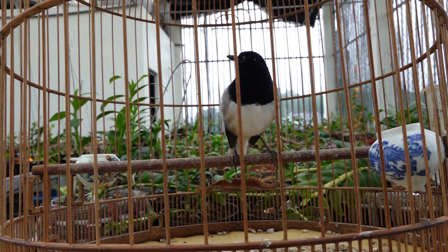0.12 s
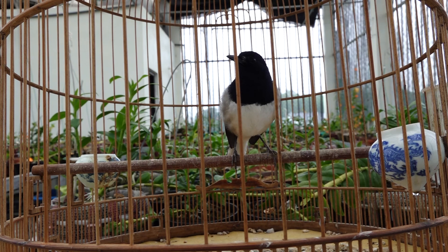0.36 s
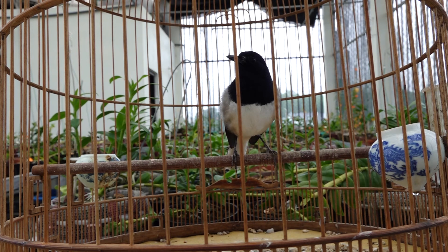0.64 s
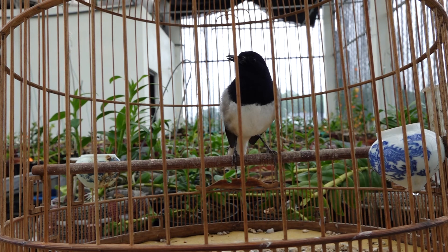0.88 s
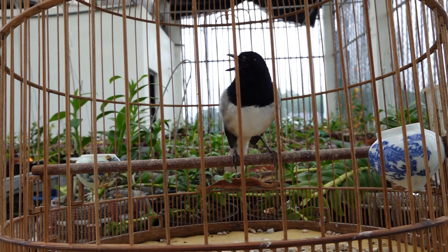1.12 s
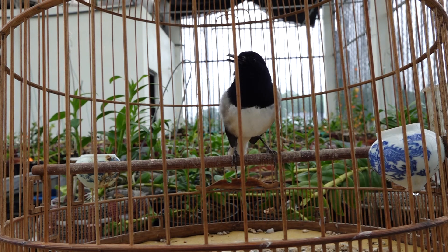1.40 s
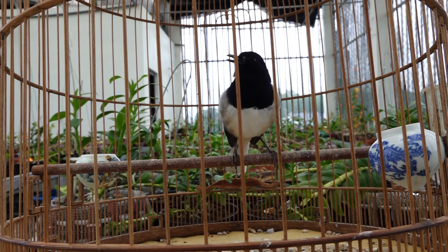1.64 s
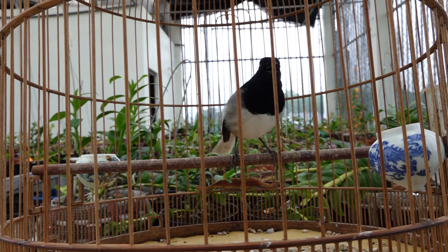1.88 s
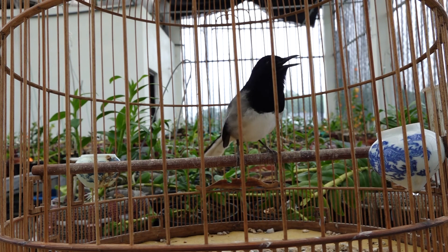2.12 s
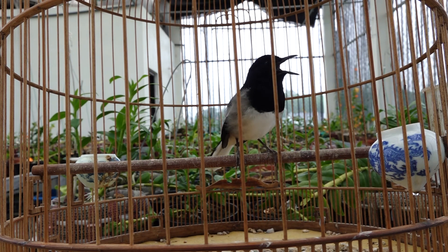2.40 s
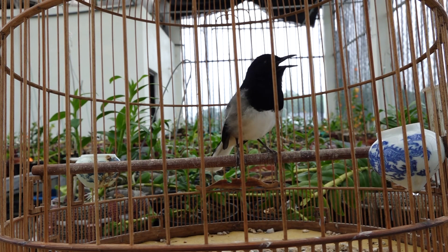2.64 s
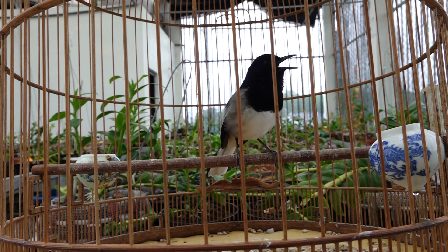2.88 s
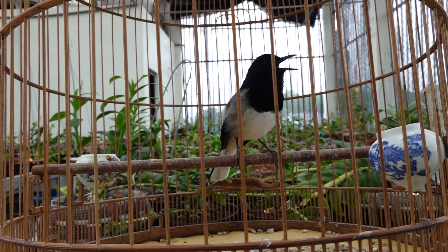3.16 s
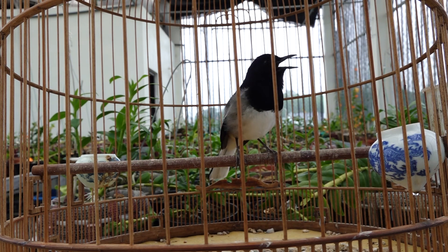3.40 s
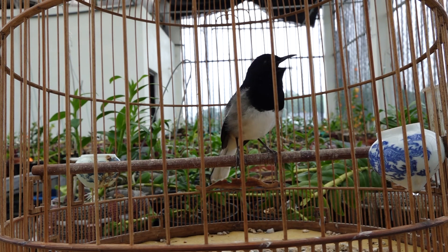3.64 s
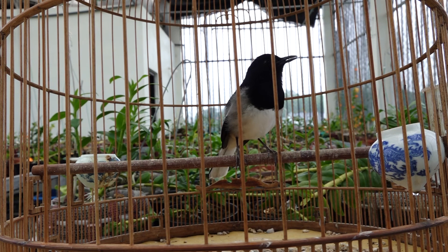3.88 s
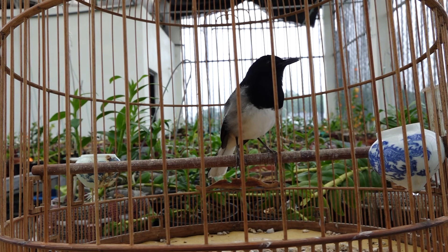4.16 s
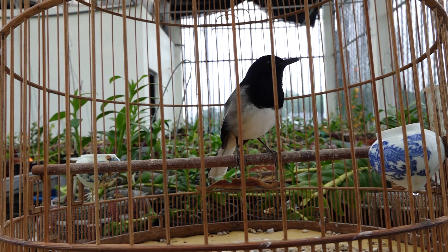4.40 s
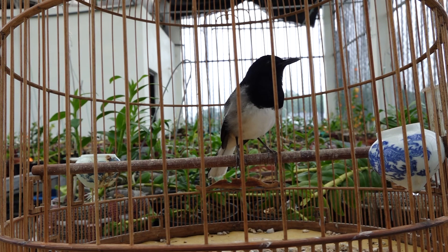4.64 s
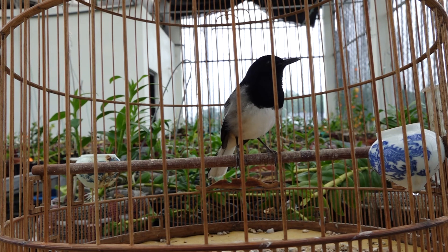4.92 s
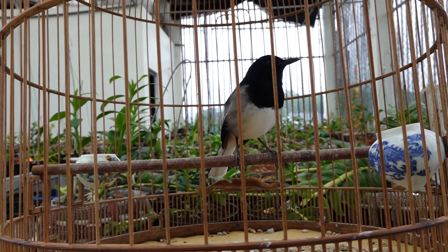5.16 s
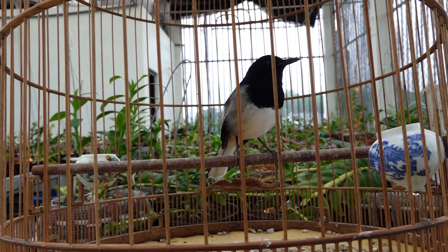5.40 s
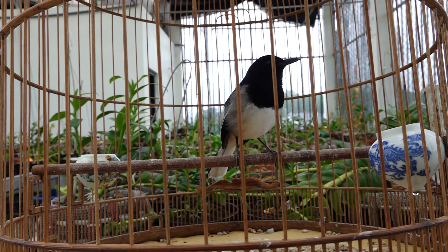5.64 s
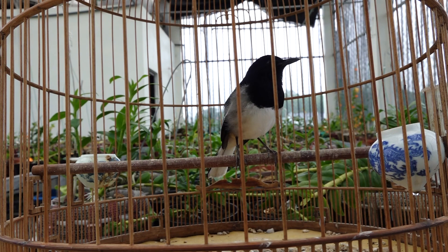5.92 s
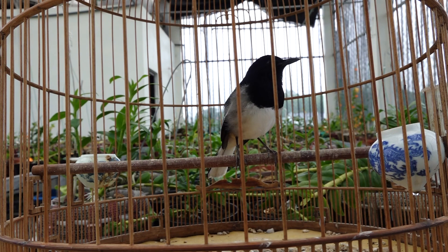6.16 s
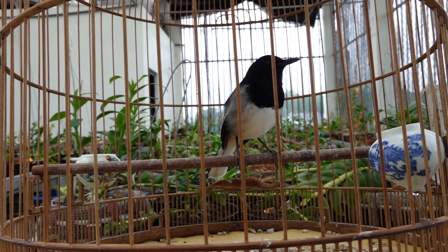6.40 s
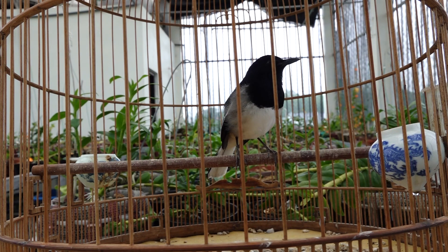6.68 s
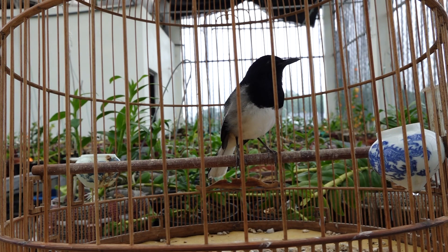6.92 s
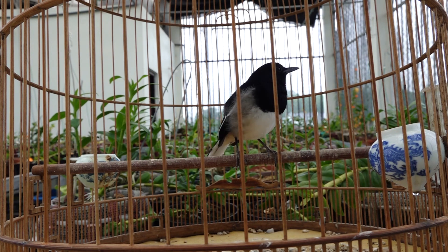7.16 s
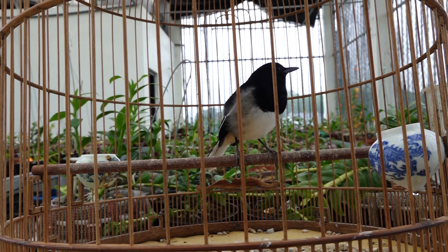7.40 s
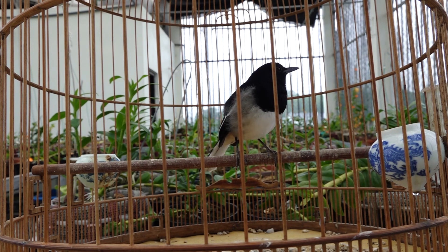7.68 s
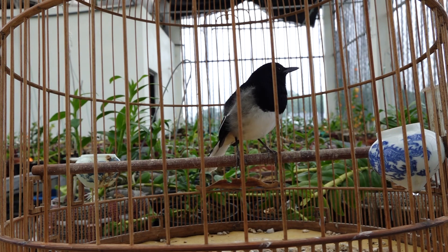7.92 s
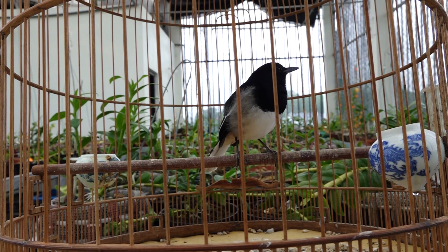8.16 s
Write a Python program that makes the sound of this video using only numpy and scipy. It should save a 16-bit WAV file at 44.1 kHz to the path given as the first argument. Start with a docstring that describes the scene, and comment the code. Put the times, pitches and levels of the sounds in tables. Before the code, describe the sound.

A terrace with hard walls, in stereo, quiet at first: low town murmur, soft hiss and very faint far birds. At about 1.06 s a caged bird close by begins with a high whistle plunging, then levelling and dropping. Short, fluttering chirps follow at 1.45, 1.66 and 1.87 s, lower and softer, then a brighter one at 2.0. From 2.25 to 2.65 s comes a loud, sustained, clear whistle, stepping slightly upward, with a lower tail. Long downward swoops follow at 2.8 and 3.07 s, then rapid, broken chirps from 3.4 to 3.8 s. Short echoes and a light reverberant tail trail the notes. The song then stops; background hiss creeps back up. Distant drones glide faintly around 3 to 5 s; far chirps are sparse, then busier after 6 s. A weak low buzz and tiny ticks come near 6.6 to 7 s, with murmur until 8.4 s.

```python
"""A terrace between hard walls: a caged songbird sings one loud phrase of sliding whistles.
Its notes are near-sines with weak harmonics; where both sides of its syrinx sound, mixing tones appear.
Far birds (wobbling sines), drones (gliding noise bands), a short buzz (harmonics) and sparse ticks surround it.
Town murmur and hiss are banded noise; the walls answer with echoes and dying noise.
The recorder turns its gain down under the song and lets it creep back."""
import sys
import numpy as np
from scipy import signal
from scipy.fft import rfft, irfft, next_fast_len
from scipy.io import wavfile
from scipy.ndimage import uniform_filter1d, minimum_filter1d

SR = 44100
rng = np.random.default_rng(int(sys.argv[2]) if len(sys.argv) > 2 else 0)


def makeup_ratio(level_db):
    """Linear amplitude ratio for a level in decibels (20 dB per factor of ten)."""
    decades = np.asarray(level_db, float) / 20
    return 10 ** decades


def transcribe(signal):
    """Save signal, clipped to [-1, 1], as a 16-bit WAV file at the path in sys.argv[1]."""
    frames = np.atleast_2d(signal).T
    limited = np.clip(frames, -1, 1)
    pcm = np.round(limited * 32767).astype(np.int16)
    wavfile.write(sys.argv[1], SR, pcm)


N = 366030


def rms_one(x):
    """Scale to rms 1."""
    return x / np.sqrt(np.mean(x ** 2) + 1e-20)


def at_hz(points, hz):
    """Read a spectrum table on a log frequency axis."""
    table_hz, values = np.transpose(points)
    return np.interp(np.log(hz), np.log(table_hz), values)


def drift(rate_hz):
    """Random wandering of rms 1: white noise through two equal one-pole low-passes."""
    r = np.exp(-2 * np.pi * rate_hz / SR)
    noise = rng.standard_normal(N + SR)
    return rms_one(signal.lfilter([1], [1, -2 * r, r * r], noise)[SR:])


def band_filter(x, order, hz, kind):
    """Butterworth filter."""
    return signal.sosfilt(signal.butter(order, hz, kind, fs=SR, output="sos"), x)


def played(rows, edge_s):
    """Sample span, gate that opens and shuts within edge_s, and columns joined by lines."""
    s, *columns = np.transpose(rows)
    span = np.arange(max(int(s[0] * SR), 0), min(int((s[-1] + edge_s) * SR), N))
    t = span / SR
    gate = np.clip(np.minimum(t - s[0], s[-1] + edge_s - t) / edge_s, 0, 1)
    return span, gate, [np.interp(t, s, c) for c in columns]


def convolve(x, response):
    """FFT convolution, cut to the scene."""
    size = next_fast_len(N + response.shape[-1])
    return irfft(rfft(x, size) * rfft(response, size), size)[..., :N]


# Contours of the song, one list a note, before flutter, colour and recorder: time_s, pitch_hz, level_db
SONG = [
    [(1.062, 6350, -26), (1.07, 6440, -18), (1.079, 5890, -10), (1.1, 4855, -11), (1.118, 4490, -8),
     (1.162, 4977, -10.5), (1.19, 5067, -8), (1.244, 4996, -15), (1.292, 4450, -7), (1.307, 4010, -13.5),
     (1.318, 3784, -24.5)],
    [(1.452, 2466, -34), (1.463, 1903, -28), (1.474, 2590, -17), (1.48, 2913, -15.5), (1.508, 3190, -10),
     (1.516, 3516, -10.5), (1.528, 3780, -17.5), (1.535, 3824, -27.5)],
    [(1.66, 2350, -30), (1.665, 2055, -25.5), (1.67, 1734, -30.5), (1.682, 2160, -24), (1.693, 2495, -14.5),
     (1.709, 2198, -19.5), (1.72, 1845, -21.5), (1.732, 1723, -25.5), (1.744, 2383, -21),
     (1.752, 2250, -20.5), (1.758, 1854, -25), (1.768, 2500, -25.5)],
    [(1.865, 2337, -28.5), (1.884, 2470, -16.5), (1.893, 2597, -10.5), (1.902, 2942, -12),
     (1.934, 3290, -9.5), (1.945, 3460, -21.5)],
    [(1.872, 1780, -37.5), (1.876, 1846, -27.5), (1.886, 2315, -15.5)],
    [(2.017, 2500, -29.5), (2.026, 3313, -10), (2.062, 3374, -4.5), (2.073, 3100, -10.5),
     (2.081, 2554, -14), (2.086, 2057, -23.5), (2.094, 2490, -15), (2.101, 2716, -7.5), (2.116, 2828, -13),
     (2.146, 2847, -8), (2.155, 2900, -21.5)],
    [(2.247, 4050, -20), (2.255, 4230, -10), (2.264, 4332, -4.5), (2.295, 4227, -4), (2.368, 4283, -0.35),
     (2.418, 4408, -3.3), (2.445, 4536, -3.5), (2.45, 4688, -4), (2.49, 4625, -3.5), (2.531, 4646, -2.5),
     (2.554, 4577, -6.5), (2.579, 4587, -11), (2.59, 4670, -19.5)],
    [(2.555, 3427, -40.5), (2.566, 3605, -18.5), (2.584, 3700, -9.5), (2.6, 3790, -12), (2.635, 3729, -8),
     (2.646, 3796, -16.5), (2.655, 3560, -22.5)],
    [(2.778, 6790, -29), (2.79, 6100, -21), (2.8, 6050, -15.5), (2.825, 5180, -7.5), (2.849, 4295, -5),
     (2.874, 3830, -6), (2.896, 3612, -5.5), (2.976, 3456, -7.5), (3.002, 3320, -15.5)],
    [(2.805, 3224, -30), (2.838, 2673, -31)],
    [(3.07, 3400, -38.5), (3.076, 3665, -24), (3.085, 4285, -9.5), (3.096, 4400, -5.5), (3.148, 4253, -3),
     (3.17, 3714, -1), (3.207, 3510, -2), (3.241, 3420, -10), (3.258, 3550, -19.5)],
    [(3.375, 1883, -43), (3.382, 2880, -28), (3.388, 3665, -15.5), (3.394, 4476, -8), (3.401, 4316, -9),
     (3.409, 4620, -5), (3.422, 5050, -16)],
    [(3.42, 4126, -8.5), (3.425, 4113, -6), (3.433, 3290, -16.5), (3.436, 3330, -13.5), (3.444, 3877, -10),
     (3.451, 3220, -18.5), (3.456, 2814, -28)],
    [(3.598, 3760, -31), (3.603, 4536, -8.5), (3.612, 4485, -7), (3.624, 4550, -8.5), (3.631, 4690, -34),
     (3.64, 4670, -18)],
    [(3.62, 2570, -43.5), (3.629, 3374, -13.5), (3.64, 3290, -18.5), (3.648, 2936, -28),
     (3.658, 3080, -21.5), (3.665, 3230, -31)],
    [(3.695, 5100, -31), (3.703, 5345, -16.5), (3.708, 5046, -15.5), (3.713, 4760, -9.5),
     (3.72, 4586, -7.5), (3.772, 3742, -13.5), (3.788, 3710, -15), (3.797, 3490, -28)],
    [(3.722, 4030, -17), (3.742, 3523, -12), (3.769, 2975, -21.5), (3.776, 2900, -26.5), (3.79, 2888, -21)],
]
# Base harmonic levels of each note, re its fundamental: second_db, third_db, fourth_db
OVERTONES = [(-30, -50.5, -67), (-23.5, -39, -44), (-24, -34, -35.5), (-24, -40, -35), (-21, -33, -44.5),
             (-30, -38.5, -43.5), (-33.5, -42, -70), (-19, -60, -48.5), (-28.5, -53, -42.5),
             (-23.5, -44.5, -56.5), (-29, -50, -46), (-26.5, -53, -59.5), (-23.5, -58.5, -53.5),
             (-30.5, -58, -72), (-18, -28.5, -53.5), (-29, -47.5, -62.5), (-31, -58, -54.5)]
# Throat colour added to the second harmonic: pitch_hz, gain_db
SECOND_BY_PITCH = [(1800, 6.5), (2500, 0), (3300, 2), (3600, -6), (4400, -1.5), (5000, 6), (5900, -3),
                   (6500, -8.5)]
# Mixing tones of the two sides: times_first_pitch, times_second_pitch
MIXING = [(1, 1), (1, -1), (-1, 2), (2, -1), (2, 1), (1, 2)]
# Level of each mixing tone re the geometric mean of both sides: level_db
MIXING_DB = [-18, -34, -30.5, -31.5, -37.5, -38]
# Colour of the song's high treble: frequency_hz, gain_db
TREBLE = [(9800, 0.5), (11300, -13.5), (13200, 8.5), (16000, 3)]


def songbird():
    """Near-sine whistles; a note begun while another still sounds comes from the second side."""
    thinning = 0.69  # dB the second harmonic gains on the first per dB the note sinks
    bend, dip, rasp = flutter()
    bend = bend * (1 + 0.0032 * drift(88))
    air_noise = rms_one(band_filter(rng.standard_normal(N), 2, [2500, 7000], "band"))
    phase, size = np.zeros((2, N)), np.zeros((2, N))
    out, busy_until = np.zeros(N), 0
    for rows, (second_db, third_db, fourth_db) in zip(SONG, OVERTONES):
        span, gate, (hz, level_db) = played(rows, 0.0018)
        second_db = second_db + at_hz(SECOND_BY_PITCH, hz) + thinning * (level_db.max() - level_db)
        second_db = np.minimum(second_db, -8.0)
        side = int(span[0] < busy_until)
        busy_until = 0 if side else span[-1]
        hz = uniform_filter1d(hz, size=130) * bend[span]
        turn = 2 * np.pi * np.cumsum(hz) / SR
        height = np.sqrt(2) * gate * makeup_ratio(level_db) * dip[span]
        phase[side, span], size[side, span] = turn, height
        wave = np.sin(turn) + rasp[span] * air_noise[span]
        harmonics_db = [second_db, third_db, fourth_db, fourth_db - 0.5, fourth_db - 8.0]
        for k, db in enumerate(harmonics_db, 2):
            wave += makeup_ratio(db) * np.sin(k * turn) * (k * hz < SR / 2)
        out[span] += height * wave
    both = np.sqrt(size[0] * size[1])
    for (first, second), db in zip(MIXING, MIXING_DB):
        out += makeup_ratio(db) * both * np.sin(first * phase[0] + second * phase[1])
    bins_hz = np.arange(1, N // 2 + 2) * SR / N
    out = irfft(rfft(out) * makeup_ratio(at_hz(TREBLE, bins_hz)), N)
    # a small open beak radiates no lows
    return band_filter(out + 1e-18, 2, 1300, "high")


# Stretches where the voice flutters: start_s, end_s, mean_rate_hz, pitch_flick_share, level_swing_share
FLUTTER = [(1.17, 1.265, 85, .07, .35), (1.452, 1.47, 300, .08, .4), (1.48, 1.508, 120, .2, .3),
           (1.508, 1.536, 400, .3, .8), (1.655, 1.68, 300, .06, .4), (1.893, 1.947, 125, .22, .5),
           (2.545, 2.6, 150, .01, .2), (2.805, 2.845, 200, .005, .1), (3.2, 3.26, 70, .05, .55),
           (3.375, 3.456, 300, .07, .3), (3.72, 3.79, 250, .01, .15)]


def flutter():
    """Large flicks snap, small ones ripple: each drives pitch and level up, then drops; air rasps meanwhile."""
    tremor_db, tremor_hz = 1, 39.8  # small random level tremor
    rasp_db, rasp_db_per_octave = -40, 11  # air noise at 150 flicks a second, more for faster flutter
    bend, dip, rasp = np.ones(N), makeup_ratio(tremor_db * drift(tremor_hz)), np.zeros(N)
    uneven = 1 + .6 * np.tanh(drift(60))
    for start, end, per_s, flick, swing in FLUTTER:
        span, gate, _ = played([(start, 0), (end, 0)], 0.0043)
        sawtooth = np.cumsum(per_s * uneven[span] / SR) % 1
        # larger flicks are rounded less
        ramp = uniform_filter1d(sawtooth, size=max(48, int(SR / per_s * (.45 - 2 * flick))))
        bend[span] += gate * flick * (ramp ** 5 - 1 / 6)
        dip[span] *= 1 + gate * swing * (2 * ramp - 1)
        rasp[span] = gate * makeup_ratio(rasp_db + rasp_db_per_octave * np.log2(per_s / 150))
    return bend, dip, rasp


# Clearest far calls, levels before the yard mix: start_s, length_s, from_hz, to_hz, level_db
FAR_BIRDS = [(0., 0.063, 3690, 3440, -62), (.1, 0.18, 2480, 2355, -68), (.147, 0.21, 5400, 4850, -69.5),
             (.75, 0.23, 3520, 3400, -70), (.45, .11, 4300, 5000, -70), (.655, 0.43, 3215, 2940, -66.5),
             (4.35, 0.38, 3400, 2700, -61), (4.75, .18, 2700, 2400, -69), (5.09, 0.059, 4290, 5400, -58),
             (5.619, 0.26, 3735, 3412, -65), (5.8, .3, 2800, 3700, -62), (5.93, 0.23, 2300, 2620, -67),
             (6.767, 0.19, 5620, 5200, -66), (7.85, 0.17, 3484, 3460, -65.5), (6.06, 0.13, 3300, 3264, -58),
             (6.17, 0.026, 3905, 3593, -44.5), (6.214, .16, 3554, 3656, -56.5),
             (6.226, .19, 3243, 2633, -57.5), (6.65, 0.22, 3350, 3386, -65.5),
             (6.717, 0.19, 3080, 2590, -61.5), (6.997, .054, 3920, 5030, -64.5),
             (7.078, .28, 3063, 2983, -71), (7.377, 0.23, 2660, 3255, -63.5),
             (7.67, .067, 3550, 3460, -59.5), (7.72, 0.15, 3285, 3370, -59.5),
             (7.99, 0.037, 6690, 4720, -60.5), (8.094, 0.18, 3796, 3713, -59),
             (8.18, 0.14, 3270, 2515, -55.5)]


def far_birds():
    """Short sine whistles whose pitch wobbles and level flickers, with fainter random chatter between."""
    wobble_share, wobble_per_slide = .015, .45  # pitch wobble, and its rise with the log of the slide
    chatter_calls, chatter_db = 16, -71
    low_hz, high_hz, largest_fall = 2400, 5500, 0.36  # chatter pitch range and share it may fall
    out, wobble, flicker = np.zeros(N), 0.97 * np.tanh(drift(150)), drift(25)
    calls = list(FAR_BIRDS)
    for k, (late, long, high, falls) in enumerate(rng.random((chatter_calls, 4))):
        start = (k + late) / (chatter_calls + 1) * N / SR
        length = np.interp(long, [0, 1], [0.09, 0.27])  # seconds
        hz = low_hz * (high_hz / low_hz) ** high
        calls.append((start, length, hz, hz * (1 - largest_fall * falls), chatter_db))
    for start, length, from_hz, to_hz, db in calls:
        span, gate, (hz,) = played([(start, from_hz), (start + length, to_hz)], 0.009)
        share = wobble_share + wobble_per_slide * abs(np.log(to_hz / from_hz))
        turn = 2 * np.pi * np.cumsum(hz * (1 + share * wobble[span])) / SR
        out[span] += gate * makeup_ratio(db + 5.5 * flicker[span]) * np.sin(turn)
    return out


# Far drones, perhaps traffic, levels before the yard mix: start_s, gone_s, first_hz, last_hz, level_db
DRONES = [(-.3, .4, 622, 615, -71), (.7, 1.2, 701, 1205, -68.5), (2.598, 3.804, 790, 724, -63.5),
          (3.2, 4.894, 1453, 1445, -66.5), (3.51, 4.897, 712, 621.6, -60.5),
          (3.799, 4.602, 1580, 1536, -65), (4.2, 5.41, 1485, 1454, -68.5), (4.4, 5.1, 555.3, 476.5, -68),
          (6.75, 7.407, 367, 340, -68), (7.8, 8.25, 544.5, 551, -70.5), (8.17, 8.378, 720, 720, -64),
          (8.17, 8.374, 1420, 1460, -63.5)]


def drones():
    """Narrow bands of noise that swell, glide and fade; the further one glides, the broader it is."""
    peak_share, base_width_hz, width_per_glide = .55, 20, .5  # peak: share of the span spent swelling
    out, t = np.zeros(N), np.arange(N) / SR
    for start, gone, first_hz, last_hz, db in DRONES:
        swell = np.interp(t, [start, start + peak_share * (gone - start), gone], [0, 1, 0])
        width_hz = base_width_hz + width_per_glide * abs(last_hz - first_hz)
        turn = 2 * np.pi * np.cumsum(np.interp(t, [start, gone], [first_hz, last_hz])) / SR
        band = drift(width_hz) * np.sin(turn) + drift(width_hz) * np.cos(turn)
        out += makeup_ratio(db) * swell * band
    return out


# Far buzz, base level before harmonic gains and the yard mix: time_s, pitch_hz, level_db
BUZZ = [(6.55, 181, -69), (6.66, 181.4, -66.5), (6.76, 179.5, -65), (6.86, 180.5, -68.5), (7.0, 181, -74)]
# Harmonics of the buzz: multiple, gain_db (before a common trim)
BUZZ_ORDERS = [(5, 2), (6, 10), (7, 5), (8, 3), (9, 3), (10, 3), (11, -3), (12, 4), (13, -2), (14, 2)]


def buzz():
    """Upper harmonics of one unsteady low pitch, each reading the same level flicker at its own offset."""
    span, gate, (hz, db) = played(BUZZ, 0.044)
    turn = 2 * np.pi * np.cumsum(hz * (1 + 0.0079 * drift(16.0)[span])) / SR
    out, flicker = np.zeros(N), drift(29.4)
    for k, order_db in BUZZ_ORDERS:
        own = np.roll(flicker, round(k) * SR // 2)[span]
        out[span] += gate * makeup_ratio(db + order_db - 7.0 + 4 * own) * np.sin(round(k) * turn)
    return out


# Tick clusters, levels before the high-pass: start_s, end_s, ticks_per_s, level_db
CRACKLE = [(0.328, 0.419, 150, -57.5), (6.755, 7.048, 200, -54.5), (7.966, 8.025, 300, -56.5)]


def crackle():
    """Faint bright ticks in short clusters: random single-sample impulses, high-passed."""
    out = np.zeros(N)
    born, sizes = rng.random(N), rng.standard_normal(N)
    for start, end, per_s, db in CRACKLE:
        span, gate, _ = played([(start, 0), (end, 0)], 0.019)
        out[span] = makeup_ratio(db) * gate * sizes[span] * (born[span] < per_s / SR)
    return band_filter(out + 1e-18, 2, 6000, "high")


# Relative noise density of the air, before hiss colour: frequency_hz, density_db (per Hz)
AIR = [(15, -40), (25, -10), (166, -7), (415, -0.5), (1830, -6), (3140, -3), (3900, -8), (4840, -1.5),
       (5850, -8), (6520, -3.5), (7260, -11), (8540, -11), (10600, -21), (13900, -20.5), (15900, -34)]
# Microphone colour, bell-shaped peaks and dips: centre_hz, width_hz, gain_db
HISS_PEAKS = [(6520, 560, 8), (7360, 780, -6), (8630, 1500, 10.5)]
# Overall air level through the scene, before the recorder: time_s, level_db
AIR_DB = [(0, -61), (.6, -62.5), (1.1, -57.5), (2.5, -56.5), (4, -59), (5, -59.5), (6, -59.5), (6.6, -58),
          (7.2, -57), (7.7, -60), (8.3, -58)]
# Left-right correlation of the air: frequency_hz, likeness (1 is mono)
LIKENESS = [(25, .998), (60, .99), (125, .94), (250, .84), (550, .66), (1650, .74), (4970, .8), (9000, .4),
            (15000, .5)]
# Left over right balance of the air: frequency_hz, balance_db
BALANCE_DB = [(500, 0.5), (1000, 0), (2000, -3.5), (5000, -2.5), (9000, -1.5), (15000, -1.5)]


def air(patchy_db):
    """Town murmur and microphone hiss in third-octave noise bands; the murmur flickers, the hiss stays even."""
    out, together, edges = 0, drift(4), 25 * 2 ** np.arange(0, 9.4, 1 / 3)
    white, flickers = rng.standard_normal((2, 2, N)), [drift(3.0) for _ in range(4)]
    for k, (low, high) in enumerate(zip(edges, edges[1:])):
        mid, side = band_filter(white[k % 2], 2, [low, high], "band")
        hz = np.sqrt(low * high)
        alike = np.clip(at_hz(LIKENESS, hz), 0, 1)
        # flicker shrinks above 1200 Hz
        flicker_db = patchy_db * min(1, 1200 / hz) * (.4 * together + flickers[k % 4])
        gain = makeup_ratio(at_hz(AIR, hz) + flicker_db)
        lean = makeup_ratio(at_hz(BALANCE_DB, hz) / 2 * np.array([[1], [-1]]))
        stereo = np.sqrt(1 + alike) * mid + np.sqrt(1 - alike) * side * [[1], [-1]]
        out = out + gain * lean * stereo
    hz = np.arange(N // 2 + 1) * SR / N
    colour_db = sum(db * np.exp(-2 * ((hz - centre_hz) / width_hz) ** 2)
                    for centre_hz, width_hz, db in HISS_PEAKS)
    swell = makeup_ratio(np.interp(np.arange(N) / SR, *np.transpose(AIR_DB)))
    return swell * rms_one(irfft(rfft(out) * makeup_ratio(colour_db), N))


# Wall echoes, before the left-right lean: delay_s, level_db
ECHOES = [(.009, -19), (.017, -25.5), (.029, -21.5), (.047, -21.5)]
# Near and far reverberation, before the left-right lean: t60_s, level_db, cutoff_hz
TAILS = [(.3, -16, 13380), (1.25, -20.5, 5956)]


def yard(side_db):
    """Stereo response of the walls: a few echoes and two tails of dying noise, stronger on the right."""
    t = np.arange(2 * SR) / SR
    response = np.zeros((2, len(t)))
    for delay, db in ECHOES:
        response[:, int(delay * SR)] = makeup_ratio(db)
    for t60, db, cut_hz in TAILS:
        mid, side = band_filter(rng.standard_normal((2, len(t))), 2, min(cut_hz, SR / 3), "low")
        shape = makeup_ratio(-60 * t / t60) * np.clip(t / 0.02, 0, 1) ** 2
        energy = np.sum((mid * shape) ** 2)
        response += makeup_ratio(db) * shape / np.sqrt(energy) * (mid + makeup_ratio(side_db) * side * [[1], [-1]])
    return response * makeup_ratio([[-1.2], [1.2]])


# Head turning of the bird, left over right: time_s, balance_db
PAN = [(1.06, -1.5), (1.5, -3), (2.051, -4), (2.3, -4), (3.801, -4)]


def scene():
    """Bird close by; far birds, drones and buzz mostly wet; ticks and air dry."""
    bird, walls = songbird(), yard(side_db=-12.0)
    pan_db = np.interp(np.arange(N) / SR, *np.transpose(PAN))
    far = far_birds() + drones() + buzz()
    wet = convolve(bird + makeup_ratio(11.0) * far, walls)
    near = bird * makeup_ratio(pan_db / 2 * [[1], [-1]])
    faint = (makeup_ratio(-4.0) * far + crackle()) * makeup_ratio([[-.8], [.8]])
    return near + wet + faint + air(patchy_db=2.29)


def gain_control(x, size, threshold_db, ratio, hold_s, release_db_per_s, attack_s):
    """Loud passages pull the gain down; it holds, then climbs back at a steady rate."""
    power = uniform_filter1d(np.mean(x ** 2, axis=0), size=size)
    level_db = 10 * np.log10(power + 1e-12)
    cut_db = ratio * np.maximum(level_db - threshold_db, 0)
    hold = int(hold_s * SR) + 1
    # deepest cut of the last hold_s
    cut_db = -minimum_filter1d(np.pad(-cut_db, (hold, 0)), size=hold)[hold - hold // 2:][:N]
    climb = release_db_per_s * np.arange(N) / SR
    cut_db = np.maximum.accumulate(cut_db + climb) - climb
    r = np.exp(-1 / (attack_s * SR))
    return x * makeup_ratio(-signal.lfilter([1 - r], [1, -r], cut_db))


def crest_thump(x, top, thump_db):
    """Crests above a set level, after gain control, add a soft low thump."""
    excess = np.maximum(np.mean(x, axis=0) - top, 0)
    return x + makeup_ratio(thump_db) * band_filter(excess + 1e-18, 2, [55, 900], "band")


def roll_off(x):
    """The treble ends steeply here."""
    return signal.sosfilt(signal.butter(12, 16050, fs=SR, output="sos"), x)


def record(dry):
    """Capsule colour, slow gain control, a quick limiter on the loudest whistles, crest thump, steep low-pass."""
    # the left capsule hears more treble, the right less
    treble = band_filter(dry, 1, 6000, "high")
    x = dry + 0.2 * treble * [[1], [-1]]
    x = gain_control(x, size=882, threshold_db=-13.0, ratio=0.68,
                     hold_s=0.5, release_db_per_s=2.0, attack_s=0.012)
    x = gain_control(x, size=66, threshold_db=-9.5, ratio=0.98,
                     hold_s=.002, release_db_per_s=150.0, attack_s=0.00073)
    x = crest_thump(x, top=0.4, thump_db=-21)
    # 60 dB down from 16 kHz up
    x = signal.sosfilt(signal.cheby2(12, 60, 16000, fs=SR, output="sos"), x)
    return roll_off(x)


dry = scene()
out = record(dry)
transcribe(out)
```